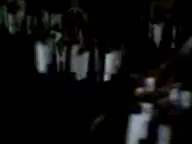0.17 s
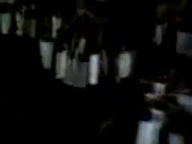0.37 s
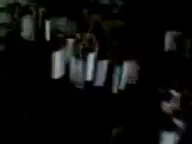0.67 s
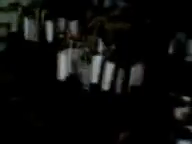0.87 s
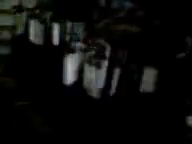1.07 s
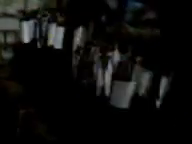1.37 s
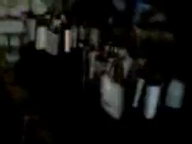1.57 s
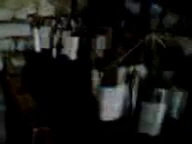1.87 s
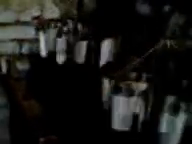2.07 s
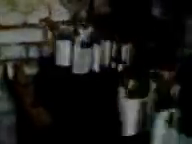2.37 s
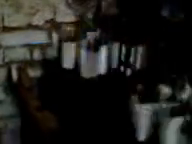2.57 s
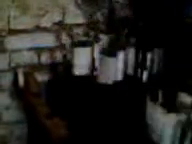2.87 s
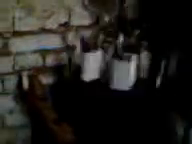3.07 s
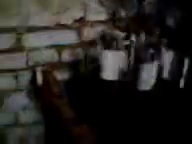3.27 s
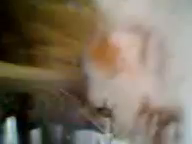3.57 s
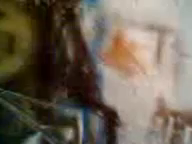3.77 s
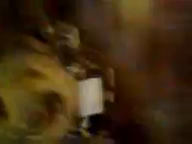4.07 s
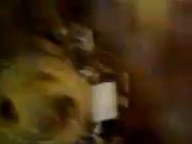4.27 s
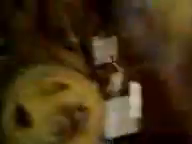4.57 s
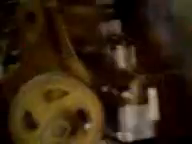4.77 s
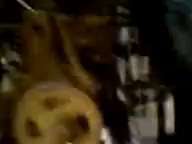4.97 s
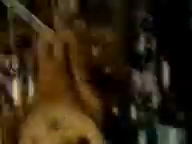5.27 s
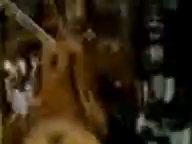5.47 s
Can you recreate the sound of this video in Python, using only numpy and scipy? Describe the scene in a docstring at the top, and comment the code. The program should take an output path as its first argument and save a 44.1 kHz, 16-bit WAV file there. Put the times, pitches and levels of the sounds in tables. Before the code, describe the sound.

In a brick workshop, a braiding machine runs with an even, dense metallic clatter, small spindle pings and wavering gear whine. Near the end of the fourth second a harsh, bright rattle bursts close by with hard clacks. A nearer machine then takes over, louder and fuller, with a sharp clack and dull frame knock, settling slightly. The small, narrow-band microphone sounds boxy, with little bass or treble and rounded peaks.

```python
"""A brick workshop where braiding machines run: bobbin carriers clatter round their tracks over whining gears.
The microphone swings past a harsh, loud rattle and comes to rest by the drive of a nearer machine, with dull knocks.
Clatter is coloured noise bursts, gears are wavering sines, and clacks and spindles are ringing modes.
A small narrow-band microphone rounds the loudest peaks."""
import sys
import numpy as np
from scipy import signal
from scipy.fft import rfft, irfft
from scipy.io import wavfile

SR = 44100
rng = np.random.default_rng(int(sys.argv[2]) if len(sys.argv) > 2 else 0)


def materialize(psi):
    """Save the field psi as 16-bit PCM at rate SR to the path in sys.argv[1].

    A 1-D psi becomes a single channel; in a 2-D psi each row is a channel.
    """
    bounded = np.clip(np.atleast_2d(psi).T, -1, 1)
    quanta = np.round(bounded * 32767).astype(np.int16)
    wavfile.write(sys.argv[1], SR, quanta)


N = 250047
TIME = np.arange(N) / SR

# loudness of the nearer braider as the microphone settles beside it: (time [s], level [dB])
NEARER_LEVEL = [(3.98, -14.5), (4.25, -16.5), (4.34, -14), (4.45, -15.5), (4.57, -18), (4.8, -18.5),
                (5.67, -19.5)]
# tone colour of the first braider's clatter: (frequency [Hz], level per Hz [dB])
FIRST_SPECTRUM = [(120, -43), (300, -27), (600, -18), (900, -12), (1200, -8), (1450, -3.5), (1800, -4),
                  (2200, -7.5), (2750, -12.5), (3550, -13.5), (3980, -28.5), (4450, -28), (4850, -42),
                  (5400, -66.5)]
# tone colour of the nearer braider's clatter: (frequency [Hz], level per Hz [dB])
NEARER_SPECTRUM = [(120, -44.5), (300, -26.5), (600, -16.5), (900, -9), (1200, -4), (1450, -3), (1950, 0.5),
                   (2350, -4), (2750, -6), (3100, -12.5), (3550, -14.5), (3980, -26), (4450, -30),
                   (4850, -44), (5400, -64.5)]
# tone colour of the harsh rattle: (frequency [Hz], level per Hz [dB])
RATTLE_SPECTRUM = [(120, -42), (300, -31.5), (550, -19), (780, -10.5), (1150, -11.5), (1480, -4.5),
                   (2000, -6), (2600, -3.5), (3050, -10.5), (3500, -14), (4000, -23), (4450, -27.5),
                   (4850, -43.5), (5400, -60)]
# steel modes that the rattle sets ringing: (frequency [Hz], level [dB], t60 [s])
RATTLE_STEEL_MODES = [(1518, 1, 0.22), (2551, -2, 0.25), (2586, -1, .15), (2650, -1.5, 0.13)]
# sharp clacks of the carriers: (time [s], strike level [dB])
CARRIER_CLACKS = [(0.43, -14), (0.52, -13), (1.21, -12), (1.355, -14), (1.453, -12), (1.475, -13),
                  (1.652, -12), (2.828, -13), (3.742, -10), (3.84, -1), (3.931, 1), (4.111, -9),
                  (4.168, -8), (4.3385, 2), (4.399, -9), (4.448, -9), (4.973, -12)]
# ringing modes of a carrier: (frequency [Hz], mean level [dB], t60 [s])
CARRIER_MODES = [(1090, -11, 0.015), (1303, -6, 0.046), (1543, 16.5, 0.023), (1750, -14, 0.036),
                 (2210, -7.5, .012), (2610, -14.5, 0.0065), (3570, -17.5, 0.021)]
# steady gear tones, before a small common lift: (frequency [Hz], level [dB])
GEAR_PITCHES = [(676, -57), (757.5, -51), (807, -50), (888, -52), (1067, -47), (1196.5, -47), (1409, -39),
                (1433, -37.5), (1458, -39), (1539.5, -39), (1645, -38), (1669, -35), (1799, -42),
                (1824.5, -38), (1848, -38.5), (1954, -43)]
# a gear tone swells where the microphone crosses a crest of its standing wave, before its waver:
# (time [s], nearest tone [Hz], level at the crest [dB], half length [s])
GEAR_SWELLS = [(.45, 1409, -28, 0.16), (0.698, 757.5, -42.5, 0.23), (1.25, 1409, -30.5, 0.32),
               (1.401, 1710, -25.5, 0.083), (1.593, 1823, -30.5, 0.95), (1.855, 1196.5, -36.5, .3),
               (2.301, 1067, -38, 0.28), (2.45, 1667, -28.5, 0.17), (2.503, 807, -41, 0.53),
               (3.301, 1067, -36, .4), (3.6, 1669, -28, .35), (3.6, 757.5, -35, 0.44),
               (3.699, 1409, -32, 0.46), (4.05, 1834, -23.5, 0.15), (4.554, 1458, -29, 0.44),
               (5.549, 1637, -31, 0.24)]
# dull, shuddering knocks on the frame: (time [s], level [dB], decay [s])
FRAME_KNOCKS = [(4.324, -23.5, 0.066), (4.845, -32.5, 0.042), (5.21, -43, .06)]
# ringing modes of the iron frame: (frequency [Hz], level [dB], t60 [s])
FRAME_MODES = [(125, -8, .04), (250, -7, .04), (415, -1, .05), (472, 2, .08), (700, -8, .03)]
# tone colour of the frame's rumble: (frequency [Hz], level per Hz [dB])
RUMBLE_SPECTRUM = [(12, -43.5), (25, -17.5), (40, -19), (75, -1.5), (125, -0.5), (220, 2), (350, -3),
                   (600, -19.5), (1500, -59.5)]

# turns of the shaft and meetings of gear teeth per second
SHAFT_HZ, MESH_HZ = 23.9, 154.9
# the microphone leaves the first braider and reaches the nearer one
SWING_S, ARRIVE_S = 3.7, 3.98
# the first braider is nearly even, and falls behind during the swing
FIRST_DB, BEHIND_DB = -23, -8
UNEVEN_DB, UNEVEN_PER_S = 0.4, 7
# the nearer clatter turns bright for a moment after the first knock
BRIGHT_S, BRIGHT_HALF_S, BRIGHT_DB = 4.42, 0.026, 6.5
# the harsh rattle passing close by
RATTLE_S, RATTLE_ATTACK_S, RATTLE_HOLD_S, RATTLE_RELEASE_S = 3.724, 0.014, 0.18, 0.042
RATTLE_DB = -10.5
# high overtones of the spindles: pitch range, fall with pitch, level below the braiders
TINKLE_LOW_HZ, TINKLE_HIGH_HZ, TINKLE_DB_PER_OCTAVE, TINKLE_DB = 2201, 4495, -18.5, -15
# the frames rumble in step with the clatter; the rattle and the knocks shake them harder
RUMBLE_DB, RUMBLE_FOLLOWS, RUMBLE_UNEVEN_DB = -54, 0.73, 0.5
RATTLE_RUMBLE_DB, KNOCK_RUMBLE_DB = -40.5, -19
KNOCK_RISE_S = 0.013


def first_braider():
    """An even clatter with spindle pings, falling behind once the microphone turns away."""
    sound = clatter(FIRST_SPECTRUM, per_s=240, spread_db=2.5, chatter_s=0.0035,
                    mesh_db=2.0, shaft_db=0.6, wash_db=-2)
    spindles = from_db(-11.5) * pings(per_s=18, ring_s=0.045)
    unevenness = from_db(UNEVEN_DB * drift(UNEVEN_PER_S))
    return first_gain() * unevenness * (sound + spindles)


def nearer_braider(edge_db=0.0, edge_waver_db=1.06):
    """A fuller clatter with spindle pings, whose bright edge above 2300 Hz comes and goes."""
    sound = clatter(NEARER_SPECTRUM, per_s=300, spread_db=3.5, chatter_s=0.004,
                    mesh_db=2.5, shaft_db=0.8, wash_db=-3)
    high_pass = signal.butter(2, 2300, "high", fs=SR, output="sos")
    edge = signal.sosfiltfilt(high_pass, sound)
    lift_db = edge_db + edge_waver_db * drift(18) + BRIGHT_DB * bell(BRIGHT_S, BRIGHT_HALF_S)
    spindles = from_db(-7.0) * pings(per_s=24, ring_s=0.08)
    return nearer_gain() * rms_one(sound + (from_db(lift_db) - 1) * edge + spindles)


def rattle(ring_db=-8):
    """Hard, bright contacts right beside the microphone, and the steel that they set ringing."""
    sound = clatter(RATTLE_SPECTRUM, per_s=460, spread_db=1.0, chatter_s=0.0037,
                    mesh_db=0.5, shaft_db=-2.5, wash_db=-6.5)
    ringing = noise_driven(RATTLE_STEEL_MODES)
    return from_db(RATTLE_DB) * rattle_envelope() * rms_one(sound + from_db(ring_db) * ringing)


def clacks():
    """Single hard hand-overs of a carrier; each strikes every mode with a strength of its own."""
    s, strike_db = np.transpose(CARRIER_CLACKS)
    chance_db = rng.normal(0, 4.5, (len(s), len(CARRIER_MODES)))
    strengths = from_db(np.array(CARRIER_MODES)[:, 1] + chance_db)
    # scale the modes of each clack together to its strike level
    strengths *= (from_db(strike_db) / np.linalg.norm(strengths, axis=1) / np.sqrt(2))[:, None]
    ringing = np.zeros(N)
    for k, (hz, _, t60) in enumerate(CARRIER_MODES):
        force = np.zeros(N)
        force[(s * SR).astype(int)] = strengths[:, k]
        ringing += ring(force, hz, t60)
    band = signal.butter(3, [700, 3600], "band", fs=SR, output="sos")
    return workshop(signal.sosfilt(band, ringing), wet_db=-3.0)


def gears(steady_db=0.36, waver_db=3.37):
    """Tooth tones waver, and swell as the microphone moves through the standing waves of the room."""
    pitches = np.array(GEAR_PITCHES)[:, 0]
    gains = [from_db(db + steady_db) for _, db in GEAR_PITCHES]
    for s, hz, db, half_s in GEAR_SWELLS:
        nearest = np.argmin(np.abs(pitches - hz))
        gains[nearest] = np.maximum(gains[nearest], from_db(db) * bell(s, half_s))
    whine = 0
    for hz, gain in zip(pitches, gains):
        whine = whine + gain * from_db(waver_db * drift(9.9)) * gear_tone(hz)
    return whine


def gear_tone(hz):
    """A tooth tone: the speed wanders slightly and the turning shaft adds side tones; rms 1."""
    shaft_sway = 0.35 * np.sin(2 * np.pi * SHAFT_HZ * TIME)   # radians, as is the wander
    phase = 2 * np.pi * hz * TIME + shaft_sway + 0.3 * drift(5)
    return np.sqrt(2) * np.sin(phase + 2 * np.pi * rng.random())


def tinkle(per_s=14, ring_s=0.1, count=18):
    """Light taps ring the high overtones of the spindles, each on its own; rms 1."""
    out = 0
    for hz in np.geomspace(TINKLE_LOW_HZ, TINKLE_HIGH_HZ, count):
        taps = random_taps(per_s, weakest=0.43)
        fall_db = TINKLE_DB_PER_OCTAVE * np.log2(hz / TINKLE_LOW_HZ)
        out = out + from_db(fall_db) * ring(taps, hz, ring_s)
    return rms_one(out)


def frame():
    """The iron frame rumbles with the clatter and booms when it is jolted."""
    jolts = 0
    for s, db, decay_s in FRAME_KNOCKS:
        # rises before the crest, dies away after it
        fall = np.maximum((s - TIME) / KNOCK_RISE_S, (TIME - s) / decay_s)
        jolts = jolts + from_db(db) * np.exp(-fall)
    running = from_db(RUMBLE_DB) * (braiders_gain() / from_db(FIRST_DB)) ** RUMBLE_FOLLOWS
    shaken = from_db(RATTLE_RUMBLE_DB) * rattle_envelope() + from_db(KNOCK_RUMBLE_DB) * jolts
    level = np.hypot(running, shaken) * from_db(RUMBLE_UNEVEN_DB * drift(12))
    rumble = level * coloured(rng.standard_normal(N), RUMBLE_SPECTRUM)
    return rumble + jolts * noise_driven(FRAME_MODES)


def clatter(spectrum, per_s, spread_db, chatter_s, mesh_db, shaft_db, wash_db, hall_s=0.028):
    """Carriers strike in brief chatters; the force swells with every gear tooth and shaft turn; rms 1."""
    # the carriers keep pace, but each has some play
    turns = np.cumsum(per_s / SR * from_db(3 * drift(200)))
    struck = np.diff(np.floor(turns), prepend=-1) > 0
    energy = struck * from_db(spread_db * np.clip(rng.standard_normal(N), -2, 2)) ** 2
    mesh = np.sin(2 * np.pi * MESH_HZ * TIME)
    shaft = np.sin(2 * np.pi * SHAFT_HZ * TIME)
    load = from_db(mesh_db * mesh + shaft_db * shaft)
    contacts = np.sqrt(dying(energy, chatter_s)) * load * rng.standard_normal(N)
    # the walls and the far carriers blur the same blows into a wash
    wash = from_db(wash_db) * np.sqrt(1 + dying(energy, hall_s)) * rng.standard_normal(N)
    return coloured(contacts + wash, spectrum)


def pings(per_s=22, ring_s=0.07, count=16):
    """Loose spindles ring briefly, each at a pitch of its own; rms 1."""
    out = 0
    for hz in np.geomspace(1300, 1950, count):
        taps = random_taps(per_s, weakest=0.28)
        out = out + ring(taps, hz * (1 + 0.012 * rng.standard_normal()), ring_s)
    return rms_one(out)


def random_taps(per_s, weakest):
    """Clicks at chance moments, of either sign and of strengths from weakest to 1."""
    return (rng.random(N) < per_s / SR) * rng.uniform(weakest, 1, N) * rng.choice([-1, 1], N)


def noise_driven(modes):
    """Steady noise keeps every mode ringing; rms 1."""
    return rms_one(sum(from_db(db) * ring(rng.standard_normal(N), hz, t60) for hz, db, t60 in modes))


def ring(force, hz, t60):
    """A two-pole resonator: a unit click sets a decaying sine of initial height 1 ringing."""
    r, w = from_db(-60 / (t60 * SR)), 2 * np.pi * hz / SR
    # the tiny offset avoids slow arithmetic in silence
    return signal.lfilter([0, np.sin(w)], [1, -2 * r * np.cos(w), r * r], force + 1e-18)


def dying(energy, seconds):
    """Each burst of energy fades exponentially, its amplitude to 1/e in the given seconds; mean 1."""
    faded = signal.lfilter([1], [1, -np.exp(-2 / (seconds * SR))], energy + 1e-18)
    return faded / faded.mean()


def coloured(x, spectrum):
    """Pass x through a causal (minimum-phase) body with this spectrum; rms 1."""
    hz, db = np.transpose(spectrum)
    grid = np.maximum(np.arange(N // 2 + 1) * SR / N, 1)
    level_db = np.interp(np.log(grid), np.log(hz), db)
    cepstrum = irfft(np.log(from_db(level_db)), N)
    # folding the cepstrum onto positive time makes the response causal
    response = np.exp(rfft(2 * cepstrum[:N // 2], N))
    return rms_one(irfft(rfft(x) * response, N))


def first_gain():
    """Steady until the microphone swings away, then falling to a lower steady gain."""
    return from_db(FIRST_DB + np.interp(TIME, [SWING_S, ARRIVE_S], [0, BEHIND_DB]))


def nearer_gain(fade_in_s=0.08):
    """Fades in at the end of the swing, then follows the level table."""
    s, db = np.transpose(NEARER_LEVEL)
    return from_db(np.interp(TIME, s, db)) * np.clip(1 + (TIME - ARRIVE_S) / fade_in_s, 0, 1)


def braiders_gain():
    """Both braiders added as independent noises, by power."""
    return np.hypot(first_gain(), nearer_gain())


def rattle_envelope():
    """A sudden start, a hold and an exponential release; height 1."""
    age = TIME - RATTLE_S
    release_age = np.maximum(age - RATTLE_ATTACK_S - RATTLE_HOLD_S, 0)
    return np.clip(age / RATTLE_ATTACK_S, 0, 1) * np.exp(-release_age / RATTLE_RELEASE_S)


def bell(s, half_s):
    """A smooth Gaussian swell of height 1 around s."""
    return np.exp(-0.5 * ((TIME - s) / half_s) ** 2)


def drift(per_s):
    """Smooth chance with a spread of 1: noise low-passed around per_s."""
    hz = np.arange(N // 2 + 1) * SR / N
    return rms_one(irfft(rfft(rng.standard_normal(N)) / (1 + (hz / per_s) ** 2), N))


def from_db(db):
    """Decibels to gain."""
    return 10 ** (np.asarray(db) / 20)


def rms_one(x):
    """Scale to an rms of 1."""
    return x / np.sqrt(np.mean(x ** 2) + 1e-20)


def workshop(x, wet_db, t60=0.16):
    """Add the diffuse echo of the brick walls: fading noise that starts after 4 ms."""
    t = TIME[:SR]
    tail = rng.standard_normal(SR) * from_db(-60 * t / t60) * (t > 0.004)
    return x + from_db(wet_db) * signal.fftconvolve(x, tail / np.linalg.norm(tail))[:N]


def scene():
    """All the machines at one microphone."""
    machines = first_braider() + nearer_braider() + rattle() + clacks() + gears() + frame()
    overtones = from_db(TINKLE_DB) * braiders_gain() * tinkle()
    return (machines + overtones)[None]


def record(dry, hiss_db=-87):
    """Peaks are rounded, bass and treble cut, the highest overload clipped flat, and faint hiss added."""
    rounded = dry / (1 + (dry / 1.01) ** 4) ** (1 / 4)
    bass_cut = signal.butter(3, 44, "high", fs=SR, output="sos")
    treble_cut = signal.cheby2(16, 70, 5650, fs=SR, output="sos")
    narrow = signal.sosfilt(treble_cut, signal.sosfilt(bass_cut, rounded))
    clipped = np.clip(narrow, -0.96, 0.96) + from_db(hiss_db) * rng.standard_normal(N)
    # a last low-pass limits the hiss and the sharp corners of the clipping
    return signal.sosfilt(signal.cheby2(12, 60, 17000, fs=SR, output="sos"), clipped)


dry = scene()
out = record(dry)
materialize(out)
```